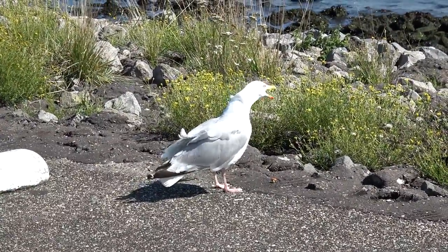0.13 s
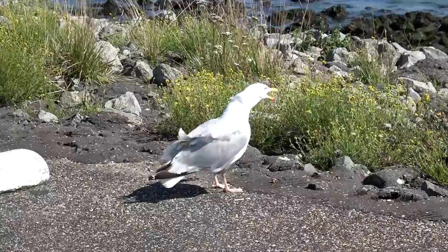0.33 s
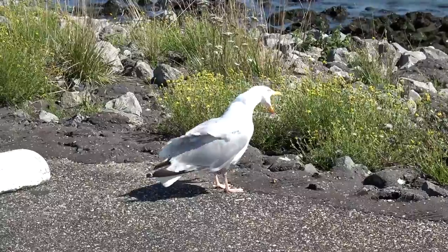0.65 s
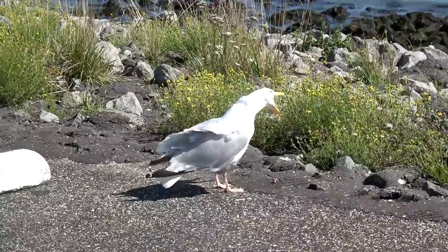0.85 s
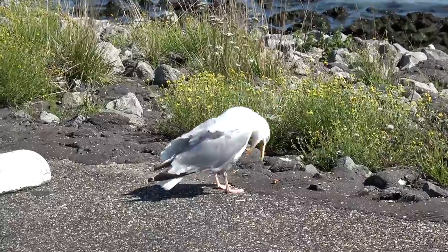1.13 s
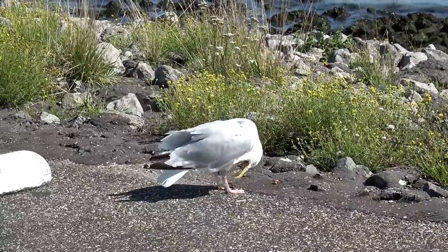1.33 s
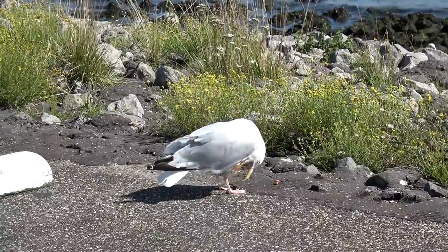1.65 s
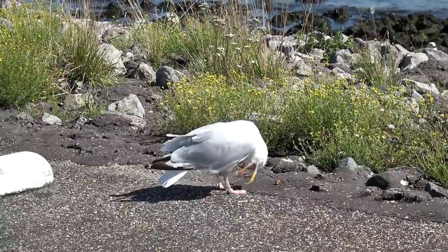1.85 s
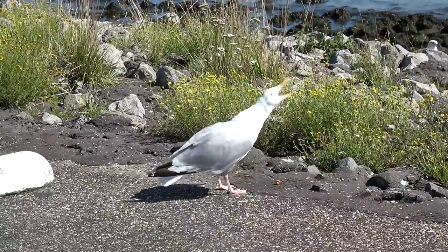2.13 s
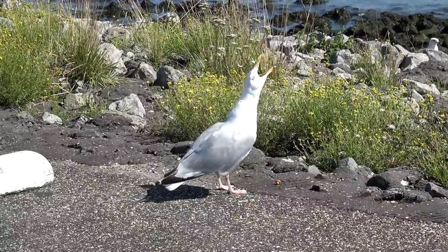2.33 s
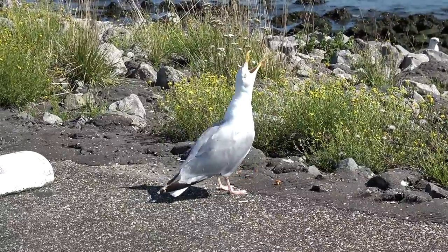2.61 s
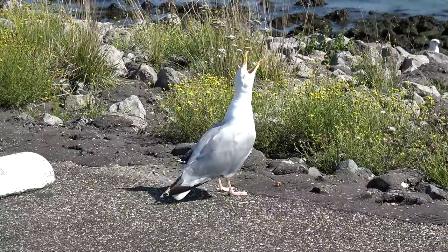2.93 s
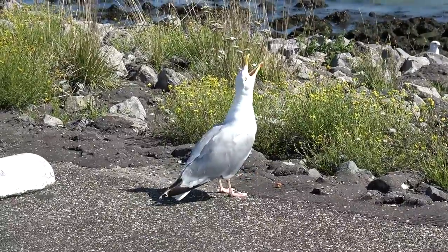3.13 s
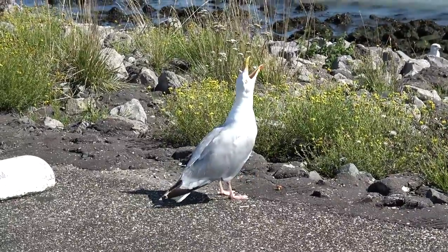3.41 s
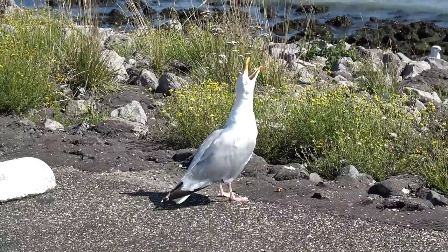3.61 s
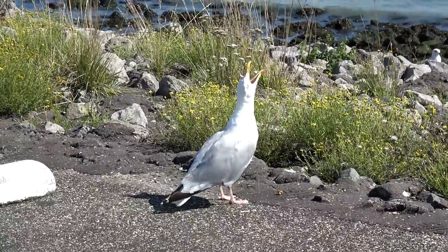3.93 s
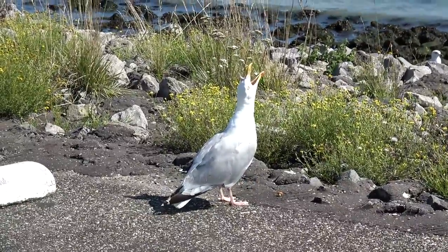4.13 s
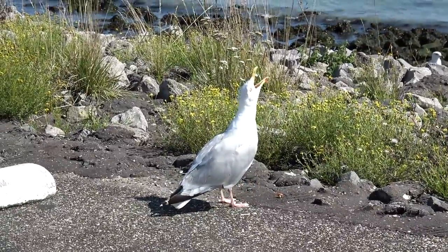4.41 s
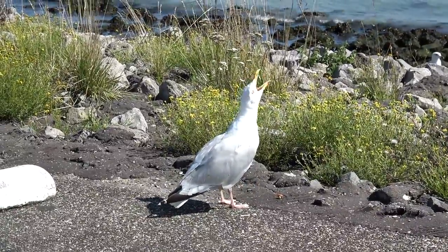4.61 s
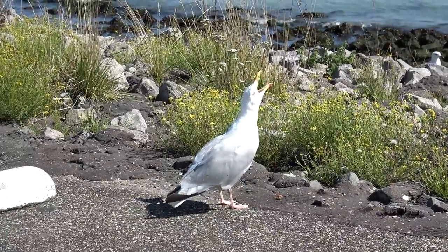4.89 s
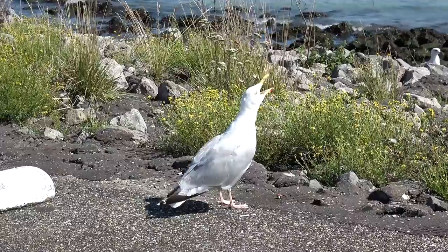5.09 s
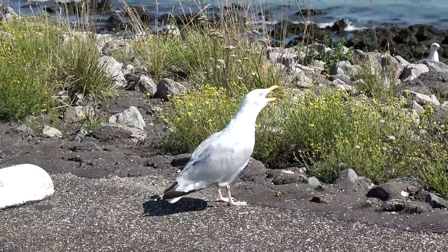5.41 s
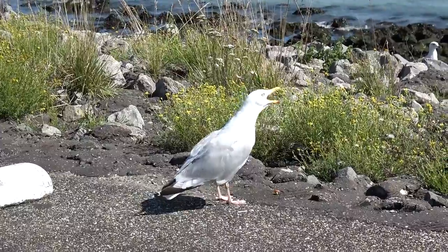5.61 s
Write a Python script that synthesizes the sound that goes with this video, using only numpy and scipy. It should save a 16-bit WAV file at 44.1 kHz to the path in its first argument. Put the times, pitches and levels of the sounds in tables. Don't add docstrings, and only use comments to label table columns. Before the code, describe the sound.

Two gulls call loudly on a rocky shore, one close and yelping steadily to a hoarse break, with faint waves and rumble behind.

```python
import sys
import numpy as np
from scipy import signal
from scipy.fft import rfft, irfft, next_fast_len
from scipy.io import wavfile
from scipy.ndimage import uniform_filter1d, map_coordinates

SR = 44100
rng = np.random.default_rng(int(sys.argv[2]) if len(sys.argv) > 2 else 0)


def store_wav(level_fs):
    pcm = np.round(np.clip(np.atleast_2d(level_fs), -1, 1) * 32767)
    wavfile.write(sys.argv[1], SR, pcm.T.astype(np.int16))


def decibels_to_gain(level_db):
    exponent = np.asarray(level_db, float) / 20
    return 10 ** exponent


N = 253575
TIME = np.arange(N) / SR

# time in seconds, pitch in Hz, peak level in dB.
LONG_NOTES = [
    [(0.0, 953, -19), (0.1, 946.3, -21.5), (0.2, 951.5, -20), (0.22, 890, -19)],
    [(0.68, 967, -22), (0.76, 978, -17), (0.85, 1001, -18), (0.95, 1071, -20.5), (1.0, 1045, -19),
     (1.025, 874, -35.5)],
    [(1.28, 1045, -20), (1.34, 1189, -10.5), (1.405, 1179, -12), (1.42, 1316, -13), (1.455, 1402, -17)],
    [(1.458, 641, -7), (1.5, 672, -14), (1.57, 668, -16.5), (1.63, 674.5, -10.5), (1.645, 680, -12)],
    [(1.635, 1646, -8), (1.65, 1592, -8), (1.662, 1448, -20)],
    [(1.655, 1159, -9.5), (1.675, 1099, -11.5), (1.695, 821, -22)],
    [(1.885, 1114, -17), (1.92, 1167, -11.5), (2.0, 1208, -8.5), (2.017, 1260, -8), (2.03, 1406, -8)],
    [(2.033, 1006, -11), (2.06, 999, -10.5), (2.088, 950, -13.5)],
    [(2.08, 1455, -8), (2.1, 1332, -8), (2.105, 1115, -8.5), (2.13, 900, -26.5)],
]
LAST_NOTES = [
    [(5.713, 1193, -14.5), (5.735, 1239, -10), (5.75, 1214, -11.5)],
]
# source level of partials 1, 2,
# 3, 4 in dB, tilt above them in dB per octave.
NOTE_VOICING = [(-13.5, -19.5, -31, -18, 3.5), (-28, -23, -38.5, -14, -4), (-12.5, -23.5, -21.5, -24, 4.5),
                (-49.5, -13.5, -16.5, -20, -11.5), (-12, -49.5, -47.5, -35, 2.5), (-11, -14.5, -29, -23, 3),
                (-2, -13.5, -19.5, -24.5, 2.5), (-28, -8, -35, 1, -2), (-2, -17.5, -11.5, -37.5, 3.5),
                (-17.5, -23, -16, -34, 1.56)]
# frequency in Hz, gain in dB.
NEAR_PIPE = [(950, -7), (1200, -1.5), (2250, 5), (2700, -15), (3200, 8), (3950, -29), (4600, -5.5),
             (5400, -35.5)]

# time in seconds, pitch in Hz, rms level of partials 1, 2, 3, 4 in dB.
OPENING_CRY = [(0.243, 1122, -22, -44, -33, -58.5), (0.253, 1145, -21, -45.5, -15.5, -55.5),
               (0.299, 1210, -11.5, -28.5, -43.5, -48), (0.339, 1221, -13, -39.5, -36.5, -38),
               (0.429, 1285, -8, -39.5, -45, -54.5), (0.445, 1222, -12, -43.5, -37, -39),
               (0.459, 1195, -12.5, -32, -22.5, -52.5), (0.485, 1031, -19, -34.5, -12, -21.5),
               (0.5, 935, -25.5, -42, -49.5, -43)]
HICCUP_YELP = [(4.705, 1097, -16, -39, -35, -53), (4.713, 1102, -15.5, -32, -23.5, -45),
               (4.752, 1135, -9, -35.5, -35.5, -39), (4.763, 1232, -9, -34, -40, -41),
               (4.774, 1049, -17.5, -28, -19, -41), (4.807, 1029, -16.5, -21.5, -13, -47),
               (4.819, 1008, -29, -24.5, -14, -30), (4.834, 900, -31, -36, -27, -41)]
BREAKING_YELP = [(5.356, 1198, -16, -47, -44, -65), (5.362, 1228, -12.5, -34.5, -36, -56),
                 (5.382, 1230, -11, -48, -47.5, -44), (5.396, 1200, -13, -30.5, -34.5, -38.5),
                 (5.422, 1142, -13, -21.5, -25.5, -65), (5.436, 1128, -12, -21.5, -23.5, -52),
                 (5.454, 1144, -16, -32, -43, -61.5)]

NEAR_FRESH = [(0, 1086, -20, -13.5, -18, -40.5), (1, 1146, -7, -23, -34.5, -32.5),
              (1.091, 1334, -7.5, -18.5, -51, -58.5), (1.451, 1259, -7, -21, -25, -45),
              (1.922, 1233, -5, -26, -31, -51.5), (2.001, 1003, -22.5, -27.5, -10.5, -30),
              (3.001, 1028, -22.5, -22.5, -11, -38.5), (4, 906, -29, -27, -30.5, -43)]
NEAR_TIRED = [(0, 1041, -18.5, -27, -17.5, -46), (1.002, 1162, -8, -30, -35, -34.5),
              (1.14, 1288, -9, -19.5, -40.5, -48), (1.5, 1234, -6.5, -23.5, -31, -45.5),
              (1.882, 1172, -9.5, -27.5, -51, -35), (2.002, 1052, -16, -20, -14.5, -35.5),
              (3, 1022, -17, -32.5, -11.5, -28), (4, 908, -26.5, -35.5, -19.5, -33.5)]
NEAR_SPENT = [(0, 1073, -16.5, -24.5, -16.5, -42), (0.598, 1110, -12.5, -28, -25, -38.5),
              (0.999, 1140, -8, -23, -33.5, -30), (2.002, 1059, -12, -27.5, -14.5, -35.5),
              (3.002, 999.4, -17.5, -22.5, -9.5, -29), (4.002, 869, -31, -35, -29.5, -43.5)]
NEAR_DONE = [(0, 1097, -13, -29.5, -19, -42), (0.598, 1106, -9.5, -27.5, -25.5, -36),
             (1, 1114, -6, -29, -29.5, -30.5), (2.002, 1047, -15.5, -18, -11, -49.5),
             (3.002, 1014, -19.5, -20.5, -10, -27.5), (4.002, 891, -26, -31, -27, -36)]
NEIGHBOUR_PLAIN = [(0, 1042, -22.5, -19, -11.5, -51.5), (.3, 1074, -12, -36.5, -20.5, -52.5),
                   (0.502, 1118, -13, -23.5, -51.5, -50), (1, 1186, -6, -16.5, -50, -53),
                   (1.299, 1150, -8.5, -21.5, -24, -54.5), (2.002, 1041, -8.5, -18, -15, -25),
                   (2.998, 900, -23, -41, -26.5, -41.5)]
NEIGHBOUR_WARM = [(0, 1103, -12, -18, -24.5, -59), (0.299, 1122, -12, -22.5, -26.5, -45.5),
                  (.5, 1150, -8, -16.5, -21, -58.5), (1, 1210, -7.5, -18, -33, -56.5),
                  (1.301, 1155, -9.5, -20.5, -16, -53.5), (2, 1052, -10.5, -25, -24, -27.5),
                  (3, 887, -18.5, -41.5, -27, -43.5)]
NEIGHBOUR_FRESH = [(0, 1075, -12.5, -22, -25, -36.5), (0.999, 1194, -6.5, -23.5, -27, -57),
                   (1.219, 1335, -6, -11, -29, -60.5), (1.801, 1229, -11, -28, -47.5, -78),
                   (2.001, 1106, -7, -22, -21.5, -22.5), (3.002, 946, -17.5, -37.5, -18, -26.5)]
NEIGHBOUR_TIRED = [(0, 1060, -21, -50, -26, -35.5), (0.998, 1260, -9.5, -41, -44, -43.5),
                   (1.239, 1380, -19.5, -21, -87, -83), (1.8, 1284, -11.5, -35.5, -39, -83),
                   (1.998, 1084, -9, -26.5, -15.5, -20.5), (3.002, 970, -22.5, -24.5, -15, -48.5)]

# start in seconds, length of each leg before the closing fall in seconds, extra effort in dB.
NEAR_JUMPING = [
    (2.24, 0.057, 0.086, 0.00037, -1.3),
    (2.54, 0.054, 0.085, 0.00051, 0.37),
    (2.85, 0.049, 0.074, 0.0078, -0.076),
    (3.16, 0.05, 0.066, 0.0087, -0.071),
    (3.458, 0.049, 0.064, 0.0081, 0.4),
    (3.762, 0.056, 0.035, 0.033, 0.81),
]
NEAR_SLIDING = [
    (4.07, 0.061, 0.019, 0.046, 0.18),
    (4.385, 0.056, 0.02, 0.048, -0.026),
    (5.018, 0.044, 0.022, 0.05, 0.08),
]
NEIGHBOUR_SLIDING = [
    (.625, 0.074, 0.043, -0.43),
    (.915, 0.06, 0.056, -0.3),
    (1.205, .057, .048, .1),
]
NEIGHBOUR_JUMPING = [
    (1.495, .055, 0.022, -1.9),
    (1.795, 0.041, .035, 0.94),
    (2.11, 0.033, 0.02, 1),
    (2.4, .028, .029, 0.24),
    (2.72, 0.027, .029, -1.2),
]
# start in seconds, extra effort in dB.
NEIGHBOUR_LAST = [
    (3.16, -6),
]

# start in seconds, rms level in dB.
NEAR_RASP = [(1.857, -25.5), (2.21, -27.5), (2.503, -25), (2.808, -25.5), (3.117, -35), (3.42, -28),
             (3.725, -28), (4.029, -28), (4.343, -26), (4.655, -24.5), (4.968, -24), (5.3, -26),
             (5.666, -27.5)]
NEIGHBOUR_RASP = [(0.217, -22.5), (0.6, -23), (0.888, -22.5), (1.172, -24), (1.466, -25), (1.762, -23),
                  (2.066, -26.5), (2.384, -38.5), (2.689, -33), (3.1, -25.5)]
# centre in Hz, width in Hz, gain in dB as the rasp starts, gain in dB as it ends.
THROAT = [(730, 92, 3.5, -16.5), (1150, 240, 16.5, 10.5), (1464, 620, 2.5, 14), (2654, 390, 6.5, 6.5),
          (3076, 120, -2.5, 0.5), (3930, 250, -17.5, -13), (6840, 400, -27, -24)]
# frequency in Hz, level in dB.
NEAR_BEAK = [(4500, -33.5), (5200, -29), (6200, -32), (7200, -38), (8500, -45), (10500, -45),
             (12500, -45.5), (15500, -69.5)]
NEIGHBOUR_BEAK = [(4500, -34), (5200, -38.5), (6000, -29.5), (7000, -33), (8200, -39), (11500, -47),
                  (15500, -73.5)]

# start in seconds, end in seconds, rms level in dB, first and last pitch in Hz.
GROWL = (5.436, 5.5, -21, 385.5, 372)
# frequency in Hz, level in dB.
GROWL_COLOUR = [(380, -19), (760, -19), (1150, 1.5), (1600, 0), (2300, -9.5), (3300, -5), (4150, -14),
                (4700, -28)]

# frequency in Hz, left minus right in dB.
NEAR_SIDE = [(1000, 0.98)]
NEIGHBOUR_SIDE = [(900, -3.5), (1300, -4), (2500, -1)]

# delay in seconds, level in dB.
ROCKS = [
    (0.0235, -33),
    (0.0374, -28.5),
    (0.054, -30),
    (0.155, -38.5),
]
# frequency in Hz, time to decay 60 dB in seconds.
SHORE = [(1200, 0.66), (3000, 1), (8000, 1)]
# frequency in Hz, gain in dB.
ECHO_COLOUR = [(1100, 5), (2200, 1), (3100, -5), (4100, 6), (5200, 1), (9000, -11.5)]

# frequency in Hz, density in dB per Hz.
SURF = [(22, -25), (45, 3.5), (110, -4), (300, -9), (700, -21), (2000, -24), (6000, -39), (16000, -52.5)]
# time in seconds, rumble level in dB.
SURF_LEVEL = [(0, -38.5), (1.799, -42), (2.698, -48.5), (4.4, -44.5)]
# frequency in Hz, left-right likeness from 0 to 1.
ALIKE = [(40, 0.99), (300, 0.92), (8000, 0.87)]
# time in seconds, peak level in dB.
PEBBLES = [
    (0.05, -42),
    (4.931, -57),
    (5.131, -49.5),
]


def unit(x):
    return x / np.sqrt(np.mean(x ** 2) + 1e-20)


def along(points, hz):
    f, v = np.transpose(points)
    return np.interp(np.log(hz + 1), np.log(f + 1), v)


def wobble(rate, size=N):
    knots = rng.standard_normal(int(size * rate / SR) + 4)
    return map_coordinates(knots, [np.arange(size) * rate / SR])


def filtered(x, response):
    m = next_fast_len(x.shape[-1] + 4096)
    spectrum = rfft(x, m) * response(np.fft.rfftfreq(m, 1 / SR))
    return irfft(spectrum, m)[..., :x.shape[-1]]


def add(track, start, x):
    x = x[max(-start, 0):][:N - max(start, 0)]
    track[max(start, 0):][:len(x)] += x


def eased(v):
    return uniform_filter1d(v, size=int(0.0036 * SR))


def period_doubling(t, onset, half_db, lead_s, first):
    locking = decibels_to_gain(half_db - 40 * ((t - onset + lead_s - .014) / 0.034) ** 2 + 3 * wobble(60, size=len(t)))
    flicker_db = 2 * half_db + 6 - 12 * ((t - t[0]) / .07) ** 2 + 5.4 * wobble(25, size=len(t))
    return locking + decibels_to_gain(flicker_db) * wobble(220, size=len(t)) * first / first.max()


def note(rows, shrill_db, beak, half_db, lead_s, jitter, breath_db):
    s, hz, *low_db = np.transpose(rows)
    t = np.arange(round((s[0] - .004 - lead_s) * SR), round((s[-1] + 0.0094) * SR)) / SR
    fade = np.clip(np.minimum((t - t[0] - lead_s) / 0.0087, (t[-1] - t) / 0.013), 0, 1) ** 2
    lead = np.clip(np.minimum((t - t[0]) / (lead_s + 0.0078), (t[-1] - t) / 0.012), 0, 1)

    snap = np.diff(s) * (np.diff(s) < .0085) / 4
    s = s + np.append(snap, 0) - np.insert(snap, 0, 0)
    last_s = s[-1] - s[-2]
    last = np.clip((t - s[-2]) / last_s, 0, 1)
    pitch = eased(np.interp(t - last_s * last * (1 - last) / 2, s, hz))
    turn = 2 * np.pi * np.cumsum(pitch * (1 + jitter * wobble(180, size=len(t)))) / SR

    low = np.array([decibels_to_gain(eased(np.interp(t, s, db)) + 0.55 * wobble(88.6, size=len(t))) for db in low_db])
    flip = np.abs(np.gradient(pitch)) * SR / pitch / 17
    low[1:] /= 1 + eased(flip) ** 4

    effort = np.sqrt(np.sum(low[2:] ** 2, axis=0) + 0.36 * low[1] ** 2 + 0.024 * low[0] ** 2)
    k = np.arange(5, 17)[:, None]
    drift = np.array([wobble(22, size=len(t)) for _ in k])
    high_db = along(beak, k * pitch) + shrill_db * np.log2(k * pitch / 4000) + 6.2 * drift
    high = effort * decibels_to_gain(high_db) * (k * pitch < 15700)
    tone = np.sum(low * np.sin(np.arange(1, 5)[:, None] * turn), axis=0)
    tone += np.sum(high * np.sin(k * turn), axis=0)

    hiss = filtered(rng.standard_normal(len(t)), lambda f: decibels_to_gain(along(beak, f) - 7.5) * (f > 4500))
    tone = fade * (tone + effort * (1 + np.cos(turn)) * hiss)
    feeler = decibels_to_gain(-5.5 + 3 * wobble(200, size=len(t))) * low[0] * np.sin(turn)
    tone += lead * (1 - fade) * (t < s[1]) * feeler
    half = period_doubling(t, s[0], half_db, lead_s, low[0])
    tone += lead * half * (.1 * np.sin(turn / 2) + np.sin(3 * turn / 2) + .5 * np.sin(5 * turn / 2))
    return tone * (1 + decibels_to_gain(breath_db) * unit(wobble(1200, size=len(t))))


def throat(f):
    modes = sum(decibels_to_gain(np.transpose([gains]) / 2) * 1j * f * width / (centre * centre - f * f + 1j * f * width)
                for centre, width, *gains in THROAT)
    return modes ** 2 / (1 + 1j * f / 4500) ** 3 * (1j * f / (500 + 1j * f)) ** 2


def rasp(length, db, first_rate, last_rate, scatter, swell_db):
    t = np.arange(round(length * SR)) / SR
    cycles = np.cumsum(np.interp(t, [0, length], [first_rate, last_rate])) / SR
    at = np.flatnonzero(np.diff(np.floor(cycles), prepend=-1))
    draw = rng.standard_normal((len(at), 2))
    u = at / len(t)
    size = decibels_to_gain(20 * scatter * np.clip(draw[:, 1], -2, 1.5) + swell_db * u)
    size = size * np.clip(4 * (1 - u), 0, 1) * (1 + .4 * (u < .02))
    shift = (scatter * (1.3 - u) * draw[:, 0] * SR / first_rate).astype(int)
    at = np.clip(at + shift, 0, len(t))
    slaps = np.zeros((2, len(t) + SR // 30))
    np.add.at(slaps, (slice(None), at), [size * (1 - u), size * u])
    puff = signal.lfilter([1], [1, -np.exp(-1 / (0.0019 * SR))], slaps)
    slaps += scatter / 6 * puff * rng.standard_normal(slaps.shape[1])
    return decibels_to_gain(db) * unit(filtered(slaps, throat).sum(axis=0))


def held(curve, voicing, pipe):
    s, hz, db = np.transpose(curve)
    *source_db, shrill_db = voicing
    share = decibels_to_gain([level + along(pipe, k * hz) for k, level in enumerate(source_db, 1)])
    partial_db = db + 20 * np.log10(share / np.linalg.norm(share, axis=0))
    return np.column_stack([s, hz, *partial_db]), shrill_db


def yelps(series, fresh, tired, close_s, lift_hz, shrill_db):
    notes = []
    for start, *legs, db in series:
        worn = np.interp(start, [series[0][0], series[-1][0]], [0, 1])
        place, hz, *partial_db = ((1 - worn) * np.array(fresh) + worn * np.array(tired)).T
        leg_ends = np.cumsum([0, *np.abs(legs), close_s])
        s = start + np.interp(place - place[0], np.arange(len(legs) + 2), leg_ends)
        hz = hz + lift_hz * db * np.interp(place, [0, 1, 2], [.5, 1, 0])
        notes.append((np.column_stack([s, hz, *np.add(partial_db, db)]), shrill_db))
    return notes


def cry(rows, shrill_db):
    return np.add(rows, [0, 0, 3, 3, 3, 3]), shrill_db


def near_notes():
    curves, voicings = LONG_NOTES + LAST_NOTES, NOTE_VOICING
    notes = [held(curve, voicing, NEAR_PIPE) for curve, voicing in zip(curves, voicings)]
    notes += yelps(NEAR_JUMPING, NEAR_FRESH, NEAR_TIRED, close_s=0.017, lift_hz=0.1, shrill_db=-5.5)
    notes += yelps(NEAR_SLIDING, NEAR_SPENT, NEAR_DONE, close_s=0.019, lift_hz=5, shrill_db=-6.5)
    notes += [cry(HICCUP_YELP, shrill_db=-5.5), cry(BREAKING_YELP, shrill_db=-1.0)]
    return sorted(notes, key=lambda pair: pair[0][0][0])


def neighbour_notes():
    fall = NEIGHBOUR_TIRED[-2:]
    notes = [cry(OPENING_CRY, shrill_db=2.0)]
    notes += yelps(NEIGHBOUR_SLIDING, NEIGHBOUR_PLAIN, NEIGHBOUR_WARM, close_s=0.02, lift_hz=0.1, shrill_db=2.5)
    notes += yelps(NEIGHBOUR_JUMPING, NEIGHBOUR_FRESH, NEIGHBOUR_TIRED,
                   close_s=.044, lift_hz=0.1, shrill_db=3.5)
    notes += yelps(NEIGHBOUR_LAST, fall, fall, close_s=0.044, lift_hz=0.1, shrill_db=2.5)
    return notes


def gull(notes, rasps, beak, half_db, lead_s, jitter, breath_db, rates, scatter, overlap, grit_db):
    voice = np.zeros(N)
    starts = np.array([rows[0][0] for rows, _ in notes])
    led = np.minimum(np.searchsorted(starts, [s for s, _ in rasps]), len(notes) - 1)
    for i, (rows, shrill_db) in enumerate(notes):
        lead = lead_s * (i in led)
        tone = note(rows, shrill_db, beak, half_db if i in led else -99, lead, jitter, breath_db)
        add(voice, round((rows[0][0] - .004 - lead) * SR), tone)
    for (start, db), i in zip(rasps, led):
        gap = abs(starts[i] - start)
        add(voice, round(start * SR), rasp(gap + overlap, db, *rates, scatter, swell_db=189.5 * gap))
    for i in led:
        end = notes[i][0][-1][0]
        grit = rasp(min(0.037, end - starts[i]), grit_db, 560, 520, scatter=.16, swell_db=-3)
        add(voice, round(starts[i] * SR), grit)
        croak = rasp(0.018, -43, *rates[::-1], scatter, swell_db=-0.5)
        add(voice, round((end - .014) * SR), croak)
    return voice


def growl():
    start, end, db, first_hz, last_hz = GROWL
    u = np.clip((TIME - start) / (end - start), 0, 1)
    pitch = (first_hz + (last_hz - first_hz) * u) * (1 + .03 * wobble(200))
    turn = 2 * np.pi * np.cumsum(pitch) / SR
    k = np.arange(1, 22)[:, None]
    shake = np.array([1 + 1.1 * wobble(400) for _ in k])
    stack = np.sum(shake * decibels_to_gain(along(GROWL_COLOUR, k * last_hz)) * np.sin(k * turn), axis=0)
    fade = np.clip(np.minimum(7 * u, 5 * (1 - u)), 0, 1)
    return decibels_to_gain(db - 4.7 * u) * fade * unit(stack)


def near_gull():
    voice = gull(near_notes(), NEAR_RASP, NEAR_BEAK, half_db=-27.5, lead_s=0.017, jitter=.002,
                 breath_db=-35, rates=(270, 520), scatter=.1, overlap=.006, grit_db=-44)
    return voice + growl()


def neighbour_gull():
    return gull(neighbour_notes(), NEIGHBOUR_RASP, NEIGHBOUR_BEAK, half_db=-17.5, lead_s=.012, jitter=.004,
                breath_db=-29, rates=(320, 540), scatter=.07, overlap=.008, grit_db=-31)


def placed(x, side, lag):
    half = np.array([[.5], [-.5]])
    return filtered(np.array([x, x]),
                    lambda f: decibels_to_gain(along(side, f) * half) * np.exp(-2j * np.pi * f * lag * half))


def shore(x, wet_db):
    hz, t, z = signal.stft(rng.standard_normal((2, SR)), SR, nperseg=256)
    decay = decibels_to_gain(-60 * t / along(SHORE, hz)[:, None])
    tail = signal.istft(z * decay, SR, nperseg=256)[1]
    tail *= decibels_to_gain(4 * wobble(90, size=tail.shape[1]))
    shared = tail[0] + 0.14 * tail[1] * np.array([[1], [-1]])
    answer = decibels_to_gain(wet_db) * shared / np.linalg.norm(tail[0])
    for delay, db in ROCKS:
        facets = (1 + rng.standard_normal(6)) * np.hanning(6)
        answer[:, round(delay * SR):][:, :len(facets)] += decibels_to_gain(db) * facets / np.linalg.norm(facets)
    coloured = filtered(x, lambda f: decibels_to_gain(along(ECHO_COLOUR, f)))
    return signal.fftconvolve(coloured[None], answer, axes=1)[:, :N]


def motor():
    level = decibels_to_gain(-46.5 + 2.5 * wobble(12))
    return level * np.sin(2 * np.pi * np.cumsum(114 + 3 * wobble(12.0)) / SR)


def surf():
    s, level_db = np.transpose(SURF_LEVEL)
    z = signal.stft(rng.standard_normal((2, N)), nperseg=512)[2]
    field = uniform_filter1d(rng.standard_normal(z.shape[1:]), size=4, axis=0)
    field = uniform_filter1d(field, size=10, axis=1)
    pair = signal.istft(z * decibels_to_gain(unit(field)), nperseg=512)[1][:, :N]
    turn = lambda f: np.arccos(np.clip(along(ALIKE, f), -1, 1)) / 2
    mid, side = filtered(pair, lambda f: decibels_to_gain(along(SURF, f)) * [np.cos(turn(f)), np.sin(turn(f))])
    water = np.array([mid + side, mid - side])
    rumble = filtered(water, lambda f: 1 / (1 + (f / 200) ** 4))
    wash = (water - rumble) * decibels_to_gain([[2.4], [-2.4]])
    rumble_db = np.interp(TIME, s, level_db)
    return decibels_to_gain(rumble_db) * unit(rumble) + decibels_to_gain(rumble_db - 1.5) * unit(wash)


def pebble():
    decay = sum(decibels_to_gain(db - 60 * np.abs(TIME - s) / 0.003) * (TIME >= s) for s, db in PEBBLES)
    return filtered(decay * rng.standard_normal(N), lambda f: (1j * f / (3000 + 1j * f)) ** 2)


def scene():
    near, other = near_gull(), neighbour_gull()
    birds = placed(near, NEAR_SIDE, lag=-0.0000072) + placed(other, NEIGHBOUR_SIDE, lag=1.1e-5)
    return birds + shore(near + other, wet_db=-25.0) + surf() + motor() + pebble()


def top_cut(x):
    return signal.sosfilt(signal.butter(12, 15780, fs=SR, output="sos"), x)


def record(dry):
    return top_cut(dry)


dry = scene()
out = record(dry)
store_wav(out)
```